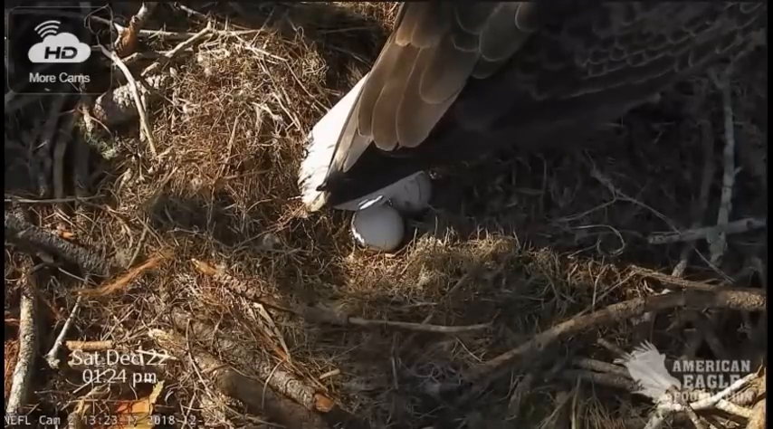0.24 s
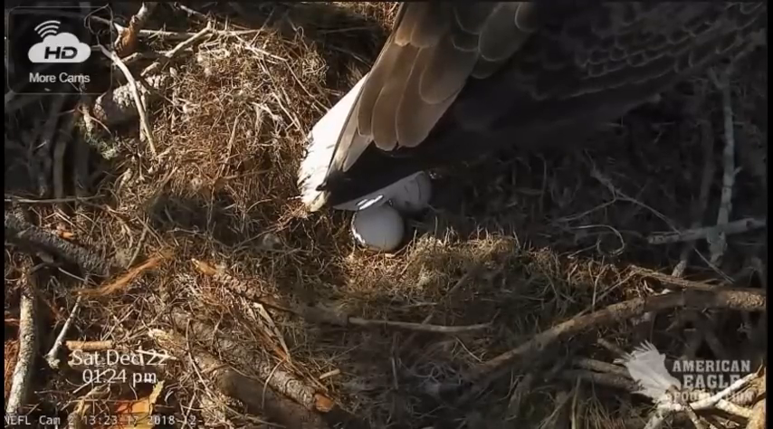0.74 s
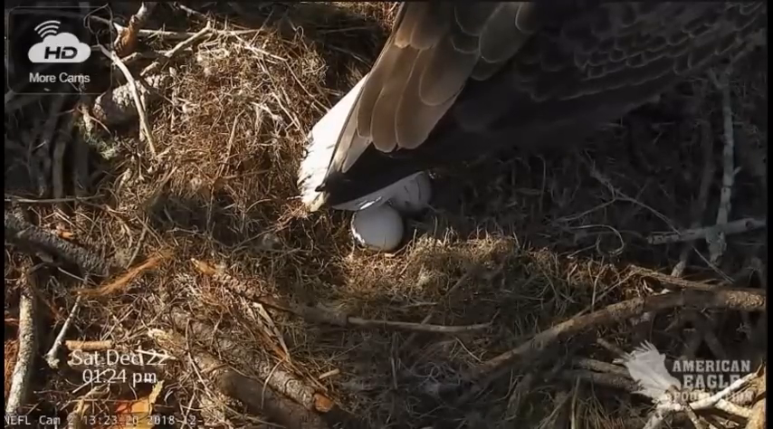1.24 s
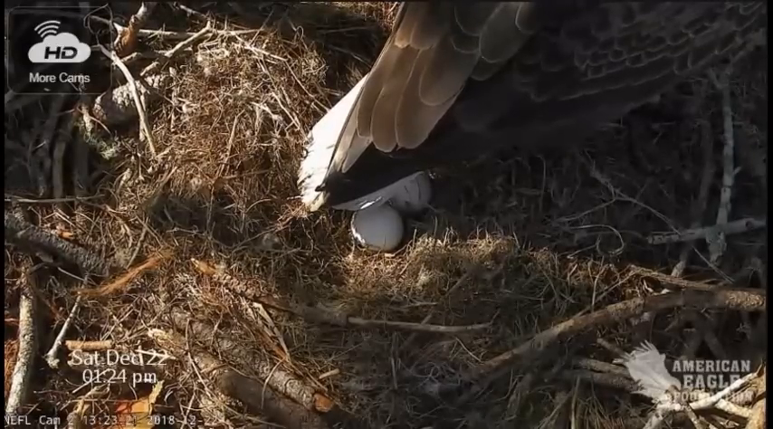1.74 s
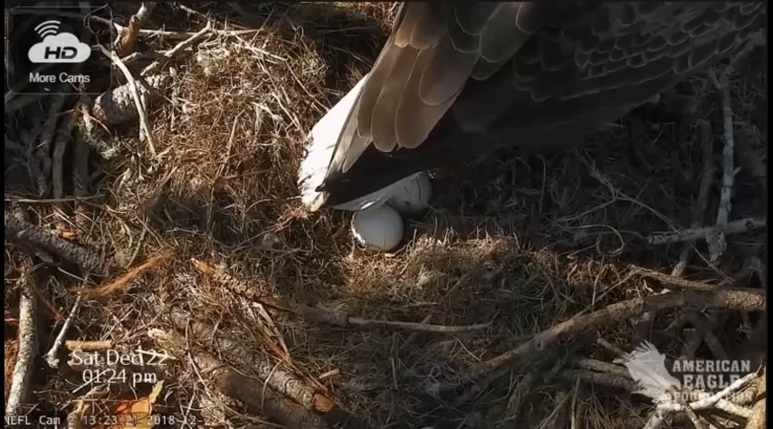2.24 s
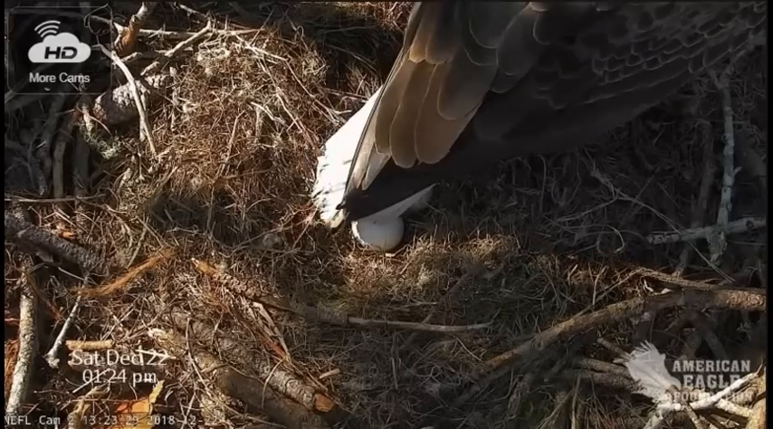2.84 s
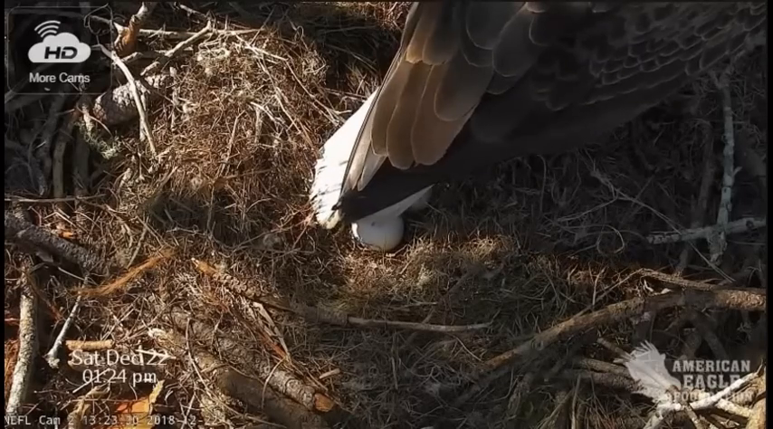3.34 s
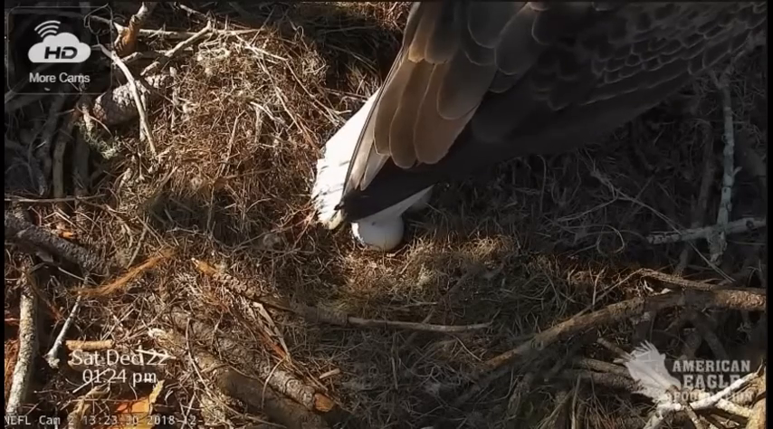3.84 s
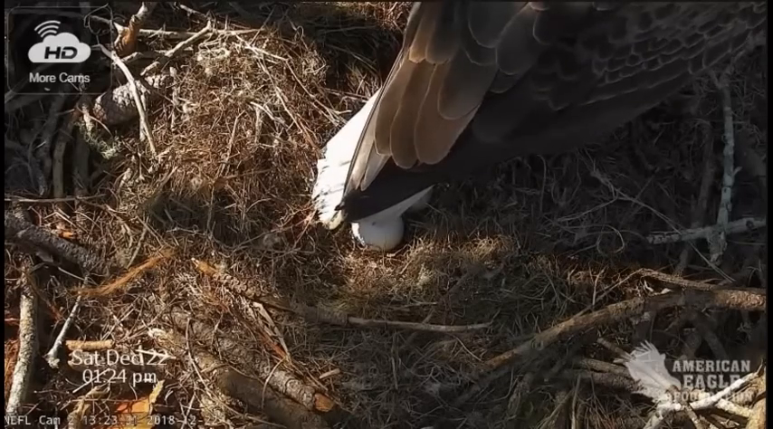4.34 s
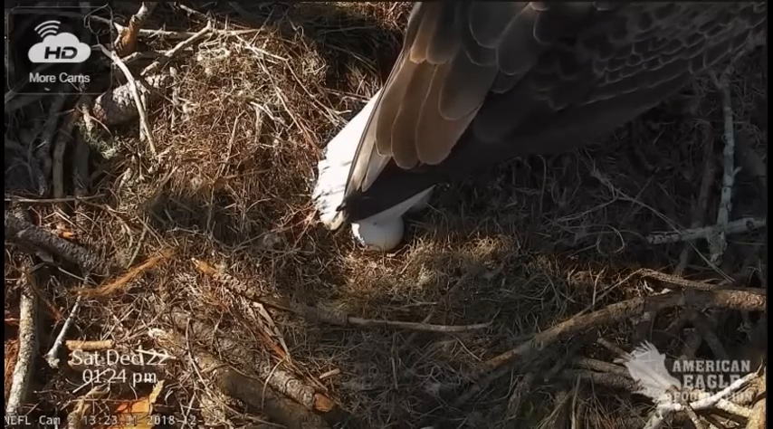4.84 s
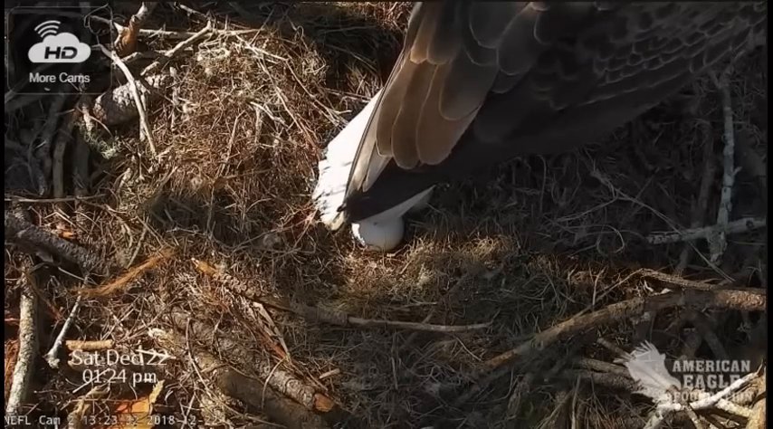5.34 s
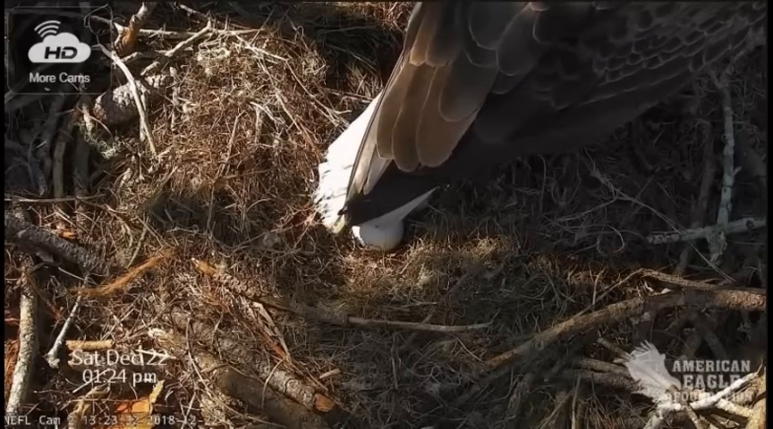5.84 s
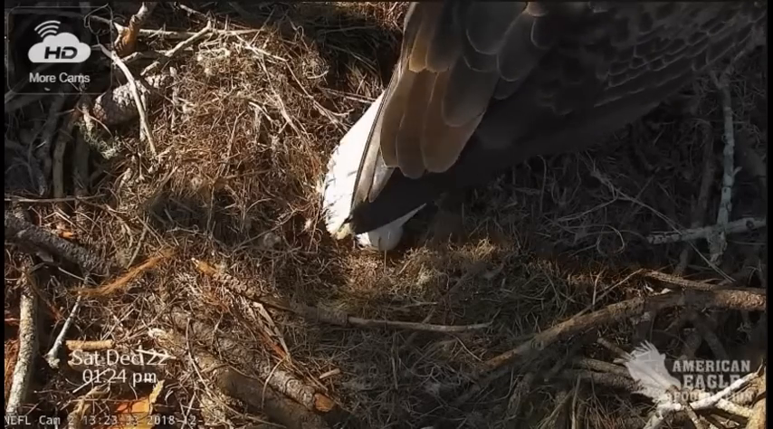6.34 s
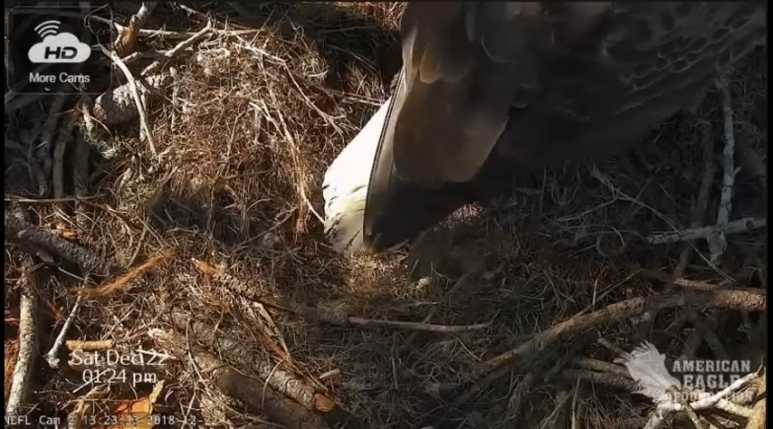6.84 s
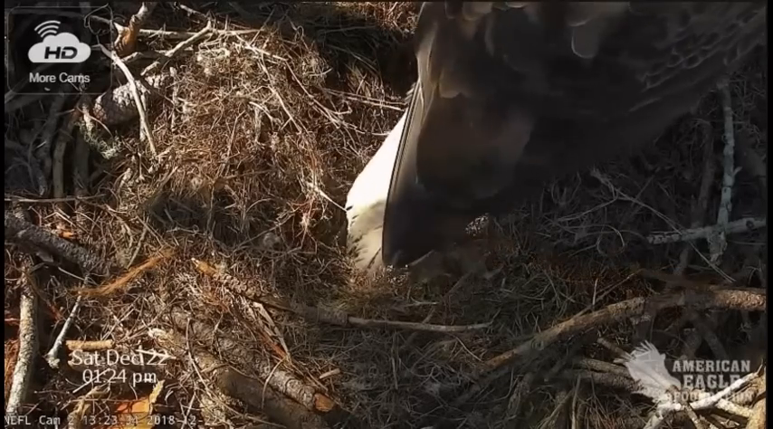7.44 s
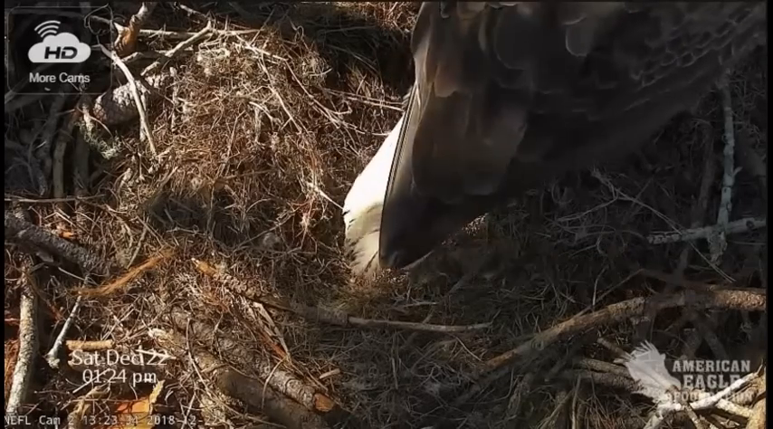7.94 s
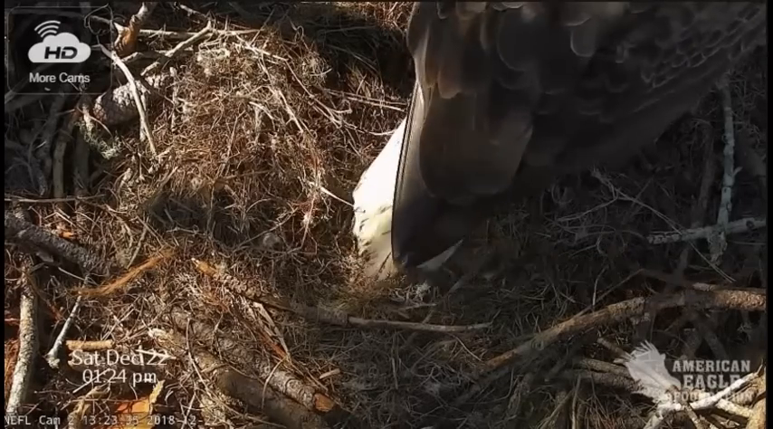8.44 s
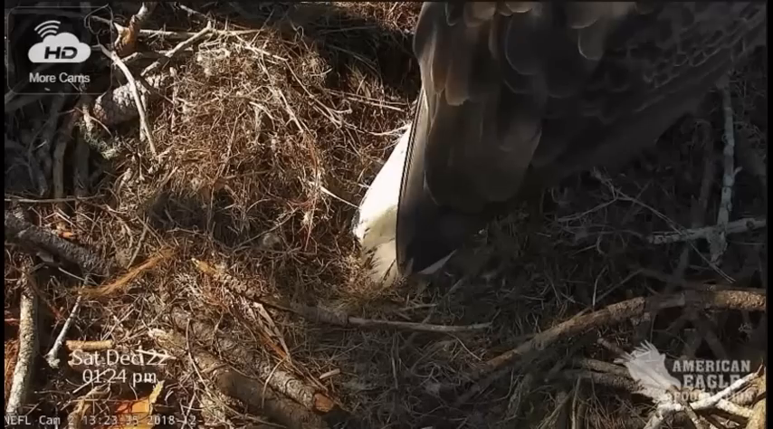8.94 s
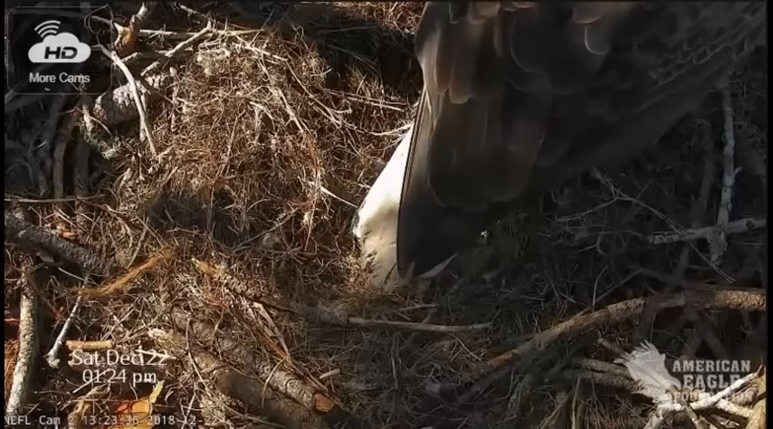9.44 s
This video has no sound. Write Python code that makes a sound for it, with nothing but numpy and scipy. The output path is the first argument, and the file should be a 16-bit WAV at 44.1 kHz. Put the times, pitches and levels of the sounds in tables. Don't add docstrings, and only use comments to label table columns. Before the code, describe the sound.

Near-silent woodland air, broken by an eagle's rapid squeaky chirps right beside the microphone. A first short burst is followed by a longer one with rasps and three cracked, upward-jumping yelps, then two more chittering runs and a last burst cut off at the end. Between them only faint hiss and the fading thin echo remain. The sound is band-limited, slightly overloaded and grainy.

```python
import sys
import numpy as np
from scipy import signal
from scipy.fft import rfft, irfft
from scipy.io import wavfile
from scipy.ndimage import uniform_filter1d

SR = 44100
rng = np.random.default_rng(int(sys.argv[2]) if len(sys.argv) > 2 else 0)


def magnitude_from_level(level_db):
    exponent = np.asarray(level_db, float) / 20
    return 10 ** exponent


def persist_wave(psi):
    counts = np.round(np.clip(psi, -1, 1) * 32767).astype(np.int16)
    wavfile.write(sys.argv[1], SR, np.atleast_2d(counts).T)


N = 429093

# (frequency [Hz], density [dB per Hz])
AIR_SPECTRUM = [(18, -73), (30, -24), (90, -15.5), (123, -19.5), (361, -24.5), (1180, -14.5), (2040, -9),
                (2810, 1.5), (3080, -3), (4050, -13), (5450, -25.5), (7000, -58.5), (9100, -83.5),
                (15400, -120)]
# (delay [s], T60 [s], level [dB])
WOODS_ECHOES = [
    (0.069, 0.79, -17.5),
    (0.053, 1.25, -12.5),
    (0.0062, 0.13, -12),
]
# (low edge, high edge) [Hz]
ECHO_BAND_HZ = [2400, 4250]
# (time [s], length [s], level [dB])
RASPS = [(2.194, 0.028, -34), (2.262, 0.015, -28.5), (2.302, 0.011, -33), (2.422, 0.054, -31.5),
         (2.539, 0.031, -28), (2.66, .03, -51.5), (2.785, 0.026, -51.5), (2.915, 0.0041, -69),
         (3.663, 0.045, -33), (3.939, 0.052, -41.5), (4.317, 0.014, -30), (5.061, 0.051, -30),
         (5.35, 0.03, -31.5), (5.456, 0.029, -30), (5.582, 0.03, -33), (5.717, 0.0083, -39),
         (7.638, 0.14, -61), (9.51, 0.026, -64), (9.634, 0.049, -43)]
# (frequency [Hz], density [dB per Hz])
RASP_SPECTRUM = [(60, 4.5), (300, 2.5), (900, 1), (1500, 5.5), (2100, 0.5), (3700, -1), (4600, -1),
                 (5100, -14.5), (8000, -39.5)]
# (time [s], length [s], level [dB])
SCREECHES = [(.512, 0.0084, -58.5), (.6, 0.16, -47), (.73, 0.14, -52.5), (1.07, 0.019, -46.5),
             (2.12, 0.066, -44), (2.3, 0.057, -36), (2.895, 0.047, -45.5), (3.74, 0.049, -42),
             (4.015, 0.043, -40), (5.015, 0.027, -55.5), (5.195, 0.073, -40), (5.275, 0.025, -37),
             (6.0, 0.02, -47.5), (7.14, 0.064, -57), (7.3, 0.11, -38), (7.49, 0.088, -48.5),
             (7.61, .03, -52), (8.212, 0.027, -44), (9.175, 0.1, -46.5), (9.295, 0.064, -46.5),
             (9.397, 0.055, -37), (9.52, 0.051, -42.5)]
# (frequency [Hz], density [dB per Hz])
SCREECH_SPECTRUM = [(900, -42.5), (1400, -15), (2200, 3.5), (3000, 8), (3600, -12.5), (4100, -1.5),
                    (4400, -53.5)]
# (time [s], length [s], pitch [Hz], level [dB])
CLUCKS = [
    (1.074, 0.013, 975, -51.5),
    (2.896, 0.019, 989, -45),
    (6.004, .022, 925, -51.5),
    (8.217, 0.013, 926.5, -55.5),
]
# (multiple of pitch [1], level [dB])
CLUCK_PARTIALS = [(1.5, -5.5), (2, 2), (3, 4)]
# (time [s], length [s], half pitch [Hz], level [dB])
SPLITS = [
    (2.194, 0.013, 1506, -33),
    (2.428, 0.026, 1531, -32),
    (3.666, 0.015, 1574, -38),
    (4.321, 0.012, 1574, -33),
    (3.028, 0.016, 1270, -47.5),
    (5.058, .02, 1459, -32.5),
    (5.35, .02, 1540, -41.5),
]
# (time [s], length [s], start [Hz], end [Hz], level [dB])
SLIDES = [(.52, 0.016, 2200, 2500, -41.5), (0.834, 0.025, 2730, 2400, -33), (2.133, 0.038, 3200, 3900, -44),
          (2.138, 0.036, 2600, 2550, -51), (2.232, 0.038, 4030, 3960, -41), (3.736, 0.03, 3260, 2950, -35),
          (4.004, 0.021, 3430, 3000, -36.5), (4.38, 0.02, 3840, 3050, -36), (4.408, 0.033, 3050, 2780, -34),
          (5.023, 0.019, 2500, 2900, -39.5), (5.023, 0.025, 3400, 3690, -43),
          (5.13, 0.061, 4193, 3927, -40), (5.155, 0.016, 3800, 3000, -32), (5.184, 0.041, 3200, 4040, -40),
          (5.22, 0.026, 4150, 4100, -29), (5.248, 0.01, 4104, 3116, -36.5),
          (7.16, 0.076, 2700, 2950, -47.5), (7.402, 0.037, 3080, 3218, -36),
          (7.657, 0.025, 2400, 2575, -32.5), (9.172, 0.031, 2900, 3500, -51),
          (9.298, 0.024, 3290, 3600, -44), (9.389, 0.048, 3400, 3100, -43.5),
          (9.516, 0.015, 2500, 2856, -28.5), (9.645, 0.0088, 2540, 2800, -25.5)]
# (tone 1 [s], tone 2 [s], tone 3 [s], end [s], level [dB])
YELPS = [
    (3.646, 3.672, 3.716, 3.762, -29),
    (3.934, 3.958, 3.975, 4.03, -30),
    (4.296, 4.311, 4.342, 4.378, -28),
]
# (start [Hz], end [Hz], level [dB], flutter [0-1])
YELP_TONES = [
    (2250, 2560, 2, .35),
    (3220, 3330, -1, .55),
    (4130, 4070, -7, .55),
]
# (time [s], length [s], top pitch [Hz], level [dB], flutter [0-1])
LOW_CHIRPS = [(.745, 0.05, 2520, -41.5, 0.54), (.848, 0.047, 2372, -32, .4), (.957, 0.018, 2394, -23.5, 0),
              (2.457, 0.029, 2326, -37, 0), (2.652, 0.047, 2360, -28.5, .4),
              (2.781, 0.013, 2309, -28, 0.49), (3.028, 0.011, 2643, -28.5, 0),
              (5.286, 0.013, 2300, -55, 0.7), (5.565, 0.053, 2300, -33, 0.62),
              (5.707, 0.054, 2392, -32.5, 0.46), (5.857, 0.038, 2327, -29, 0.4),
              (7.579, 0.021, 2198, -33.5, .2), (7.79, 0.047, 2361, -32, 0.54),
              (7.927, 0.027, 2270, -31.5, 0.49), (8.075, 0.025, 2174, -33.5, 0.31),
              (9.548, 0.022, 2255, -35, 0), (9.668, 0.023, 2354, -31, 0.34)]
# (time [s], length [s], top pitch [Hz], level [dB], flutter [0-1])
HIGH_CHIRPS = [(.528, .068, 3049, -27.5, 0.2), (.625, 0.066, 3133, -33, .85), (.727, .05, 3045, -33, .6),
               (2.178, 0.066, 2986, -32, 0.65), (2.254, 0.042, 3087, -32.5, 0.72),
               (2.31, .055, 3010, -35.5, 0.76), (2.415, 0.049, 3124, -30, .5),
               (2.533, 0.059, 2978, -29, 0.65), (5.04, 0.069, 3018, -31, .5), (5.164, 0.053, 3046, -28, .3),
               (5.254, 0.038, 3103, -30, .4), (5.322, 0.056, 3160, -32, 0.65),
               (5.439, 0.069, 3106, -27, 0.5), (7.22, 0.082, 3191, -27.5, 0.23),
               (7.345, 0.03, 3027, -41.5, 0.89), (7.432, 0.066, 3064, -30, .4),
               (7.536, 0.064, 3071, -28, 0.41), (7.664, 0.051, 2970, -29.5, 0.57),
               (9.225, 0.042, 2909, -25.5, 0.1), (9.295, 0.062, 2880, -42, 0.76),
               (9.395, 0.024, 2880, -43, 0.64), (9.516, .057, 3072, -32, .3),
               (9.642, 0.055, 2965, -26.5, 0)]
LOW_ARCH = .15, .015, 4300, 6, .55
HIGH_ARCH = .22, .012, 3000, 4, .45
# (multiple of pitch [1], level [dB])
OVERTONES = [(2, -15), (3, -22)]
# (frequency [Hz], level [dB])
LINK_GRIT = [(0, -12), (3500, -14), (4300, -7), (8000, -6)]
# (frequency [Hz], level [dB])
LINK_DROP = [(0, -49), (700, -42), (1200, -42), (2000, -88.5), (3000, -45), (3700, -18), (4600, -28),
             (5200, -38), (8000, -25.5)]
# (time [s], length [s], gain [dB])
LINK_DIPS = [
    (0.677, 0.044, -5),
    (2.395, 0.0079, -10.5),
    (2.734, 0.027, -13),
    (3.918, 0.095, 0.5),
    (4.253, 0.022, -15),
    (4.443, 0.018, -11.5),
    (5.605, 0.019, -16.5),
    (5.817, 0.023, -9),
    (5.908, 0.0054, -24),
    (7.729, 0.051, -12),
]


def level(x, db):
    return x * magnitude_from_level(db) / np.sqrt(np.mean(x ** 2))


def colour(x, points):
    hz, db = np.transpose(points)
    f = np.fft.rfftfreq(len(x), 1 / SR) + 1
    return irfft(rfft(x) * magnitude_from_level(np.interp(np.log(f), np.log(hz), db)), len(x))


def walk(rate_hz):
    k = int(SR / rate_hz)
    return level(uniform_filter1d(uniform_filter1d(rng.standard_normal(N), k), k), 0)


def gate(start_s, length_s, rise_s, fall_s):
    first = int((start_s - rise_s) * SR)
    last = min(int((start_s + length_s + 8 * fall_s) * SR), N)
    span = np.arange(first, last)
    t = span / SR - start_s
    rise = np.clip(1 + t / rise_s, 0, 1) ** 2
    fall = np.exp(-np.clip(t - length_s, 0, None) / fall_s)
    return span, t, rise * fall


def air():
    hiss = colour(rng.standard_normal(N), AIR_SPECTRUM)
    swell_db = 0.7 * walk(9.6)
    return level(hiss * magnitude_from_level(swell_db), -65.5)


def woods(voice):
    rustle = 1 + 0.45 * walk(500)
    t, tail = np.arange(2 * SR) / SR, 0
    for delay_s, t60_s, db in WOODS_ECHOES:
        onset = np.clip(t / delay_s - 1, 0, 1)
        decay = np.exp(-np.log(1000) * t / t60_s)
        echo = onset * decay * rng.standard_normal(len(t))
        tail = tail + magnitude_from_level(db) * echo / np.sqrt(np.sum(echo ** 2))
    tail = signal.sosfilt(signal.butter(4, ECHO_BAND_HZ, "band", fs=SR, output="sos"), tail)
    return signal.fftconvolve(voice * rustle, tail)[:N]


def bursts(table, spectrum, spurt_hz):
    spurts_db = 5.4 * np.minimum(walk(spurt_hz), 1.3)
    noise = level(colour(rng.standard_normal(N), spectrum) * magnitude_from_level(spurts_db), 0)
    out = np.zeros(N)
    for start_s, length_s, db in table:
        span, t, env = gate(start_s, length_s, rise_s=0.0078, fall_s=0.0066)
        out[span] += magnitude_from_level(db) * env * noise[span]
    return out


def rasps():
    return bursts(RASPS, RASP_SPECTRUM, spurt_hz=80)


def screeches():
    return bursts(SCREECHES, SCREECH_SPECTRUM, spurt_hz=120)


def line(start_s, length_s, start_hz, end_hz, db, flutter):
    return start_s, length_s, [0, 1], [start_hz, end_hz], db, flutter, 0, 0


def clucks():
    return [line(s, length_s, k * hz, k * hz * 0.98, db + partial_db, 0.1)
            for s, length_s, hz, db in CLUCKS
            for k, partial_db in CLUCK_PARTIALS]


def splits():
    out = []
    for s, length_s, hz, db in SPLITS:
        out.append(line(s, length_s, hz, hz, db, 0.4))
        out.append(line(s, length_s, 3 * hz, 3 * hz, db - 3.5, 0.4))
    return out


def slides():
    return [line(*row, 0.65) for row in SLIDES]


def yelps():
    overlap_s, out = 0.006, []
    for *times, db in YELPS:
        for s, end_s, (start_hz, end_hz, tone_db, flutter) in zip(times, times[1:], YELP_TONES):
            out.append(line(s, end_s - s + overlap_s, start_hz, end_hz, db + tone_db, flutter))
    return out


def chirps(table, top, scoop, sag_hz_s, fade_db, hoarsen):
    return [(s, length_s, [0, top, 1], [hz * (1 - scoop), hz, hz - sag_hz_s * length_s],
             db, flutter, fade_db, hoarsen)
            for s, length_s, hz, db, flutter in table]


def notes():
    low = chirps(LOW_CHIRPS, *LOW_ARCH)
    high = chirps(HIGH_CHIRPS, *HIGH_ARCH)
    return clucks() + splits() + slides() + yelps() + low + high


def whistles():
    flutter_hz, flutter_db, flutter_lift_db = 161, 10, 12.5
    breath_hz, breath_db, wobble = 600, -2, 0.04
    effort_db = -30
    shake, drift, breath = walk(flutter_hz), walk(300), walk(breath_hz)
    out = np.zeros(N)
    for start_s, length_s, places, path_hz, db, flutter, fade_db, hoarsen in notes():
        span, t, env = gate(start_s, length_s, rise_s=0.003, fall_s=0.0022)
        place = t / length_s
        db = db + flutter_lift_db * flutter
        flutter = flutter + hoarsen * (np.clip(place, 0, 1) ** 2 - 0.3)
        flutter = np.clip(1.412 * flutter - 0.2, 0, 1.3)
        hz = np.interp(place, places, path_hz) * (1 + wobble * flutter * drift[span])
        phase = 2 * np.pi * np.cumsum(hz) / SR
        fading_db = fade_db * ((1.48 * place - 0.5) ** 2 - 0.3471)
        shaking_db = flutter_db * flutter * np.abs(shake[span])
        gain = env * magnitude_from_level(db + 0.5 - fading_db - shaking_db)
        gain = gain * (1 + magnitude_from_level(breath_db) * flutter ** 2 * breath[span])
        purity_db = 0.7 * min(db - effort_db - 4, 2)
        tone = np.sin(phase)
        for k, overtone_db in OVERTONES:
            tone = tone + magnitude_from_level(overtone_db + purity_db) * np.sin(k * phase)
        out[span] += gain * tone
    return out


def scene():
    voice = whistles() + screeches()
    return (air() + woods(voice) + rasps() + voice)[None]


def overload(x):
    ceiling, thump_power, thump_db, octave_db = 0.071, 1.26, -13, 9.5
    x = ceiling * np.tanh(x / ceiling)
    thump = ceiling * np.abs(x / ceiling) ** thump_power
    thump = signal.sosfilt(signal.butter(2, [18, 900], "band", fs=SR, output="sos"), thump)
    octave = signal.sosfilt(signal.butter(4, 3800, "high", fs=SR, output="sos"), x ** 2)
    return x + magnitude_from_level(thump_db) * thump + magnitude_from_level(octave_db) * octave


def camera_link(x):
    frame, band = 2816, 16
    starve_db, starve_power, hush_db = -51.5, 0.37, -118
    window = signal.windows.cosine(frame)
    hz, _, z = signal.stft(x, SR, window=window, nperseg=frame)
    bands = np.arange(len(z)) // band
    rms = np.sqrt(np.add.reduceat(np.abs(z) ** 2, np.arange(0, len(z), band)) / band)
    grit = rng.standard_normal(z.shape) + 1j * rng.standard_normal(z.shape)
    grit = grit * magnitude_from_level(np.interp(hz, *np.transpose(LINK_GRIT)))[:, None]
    loudest = rms.max(0)
    reference = loudest * np.minimum(loudest / magnitude_from_level(starve_db), 1) ** starve_power
    drop = magnitude_from_level(np.interp(hz[::band], *np.transpose(LINK_DROP)))
    keep = rms > np.maximum(np.outer(drop, reference), magnitude_from_level(hush_db))
    z = (z + rms[bands] * grit) * keep[bands]
    y = signal.istft(z, window=window, nperseg=frame)[1][:N]
    dip_db = np.zeros(N)
    for s, length_s, db in LINK_DIPS:
        dip_db[int(s * SR):int((s + length_s) * SR)] = db
    y = y * magnitude_from_level(uniform_filter1d(dip_db, size=350))
    return signal.sosfilt(signal.ellip(10, 0.2, 80, 7750, fs=SR, output="sos"), y)


def top_cut(x):
    return signal.sosfilt(signal.butter(12, 7930, fs=SR, output="sos"), x)


def record(dry):
    mix = camera_link(overload(dry[0]))[None]
    return top_cut(mix)


dry = scene()
out = record(dry)
persist_wave(out)
```